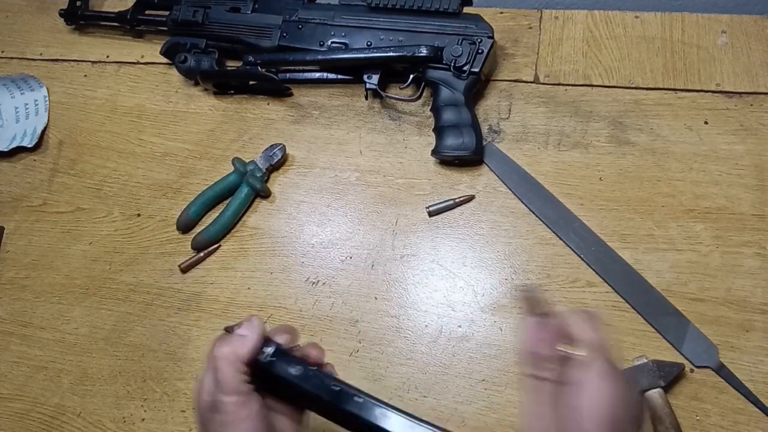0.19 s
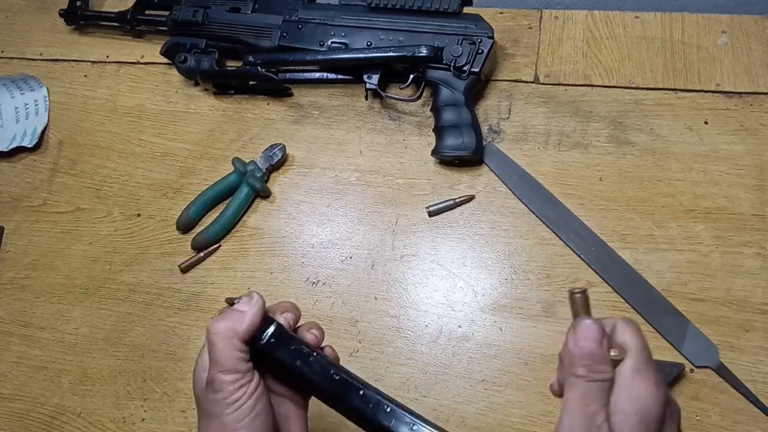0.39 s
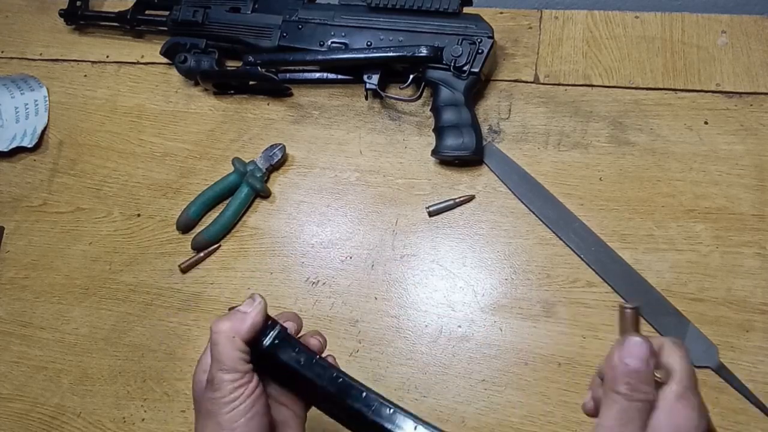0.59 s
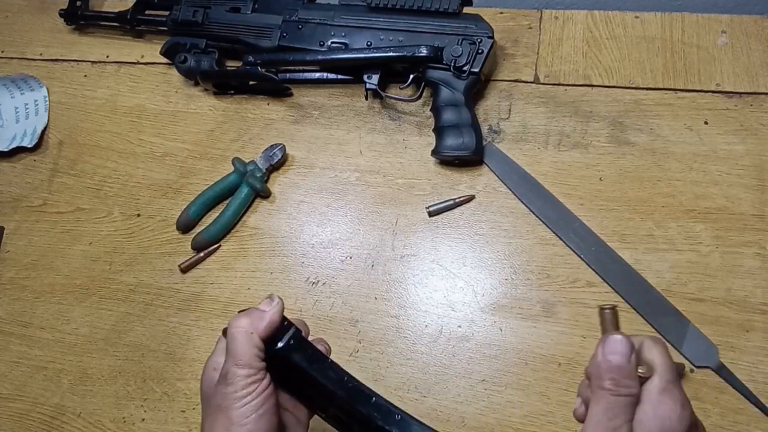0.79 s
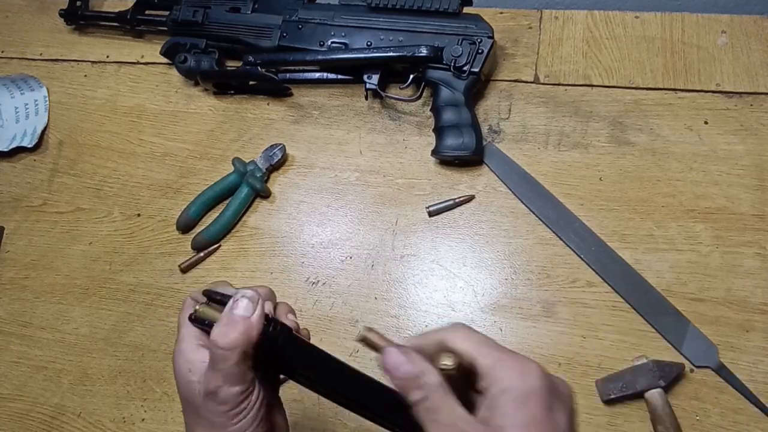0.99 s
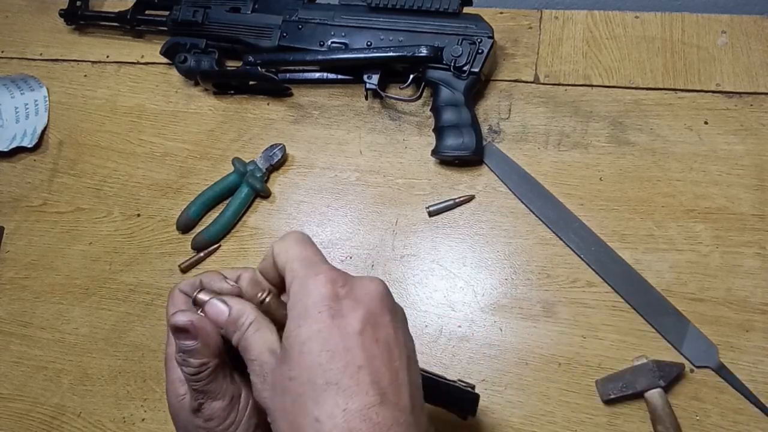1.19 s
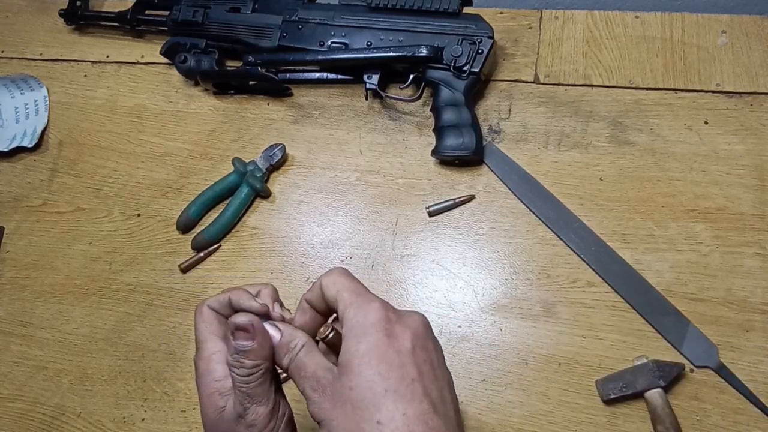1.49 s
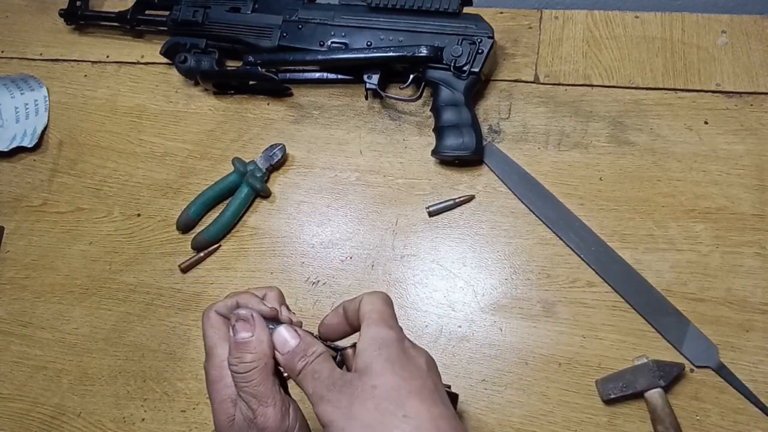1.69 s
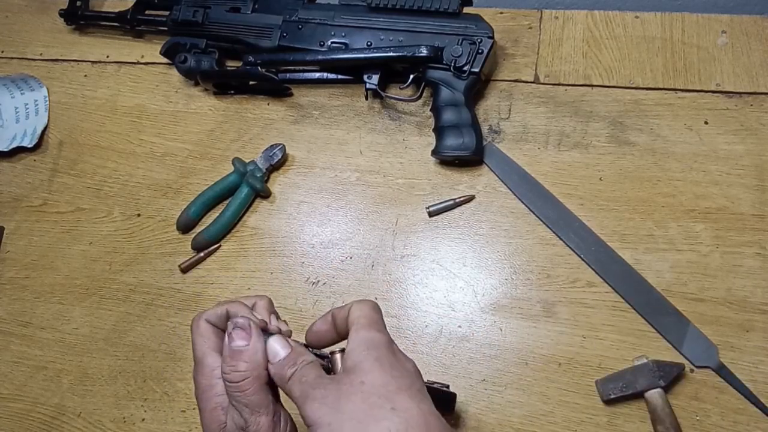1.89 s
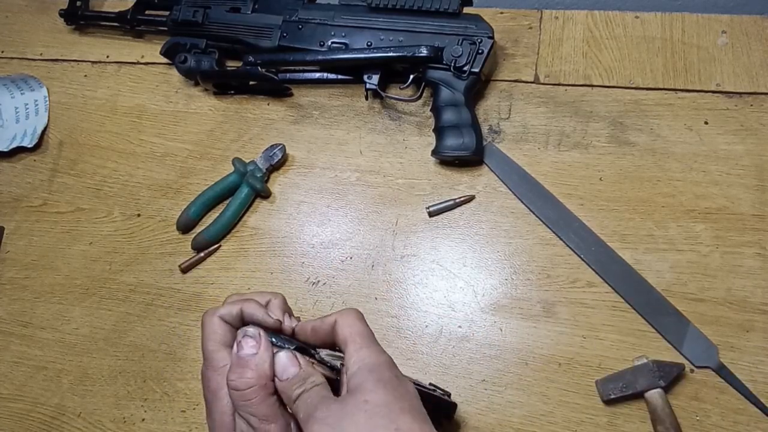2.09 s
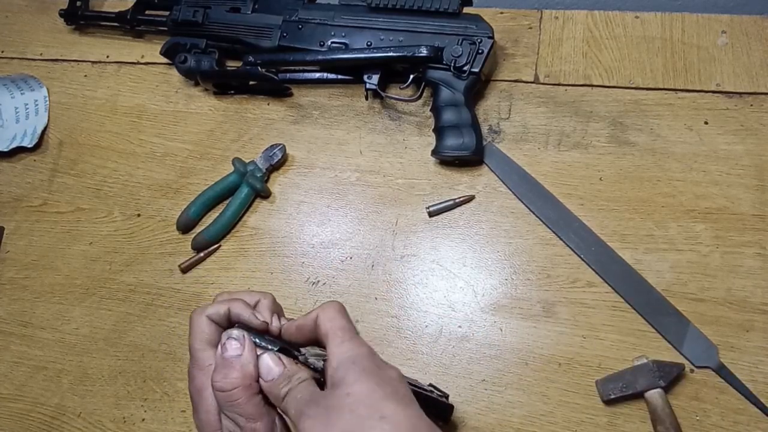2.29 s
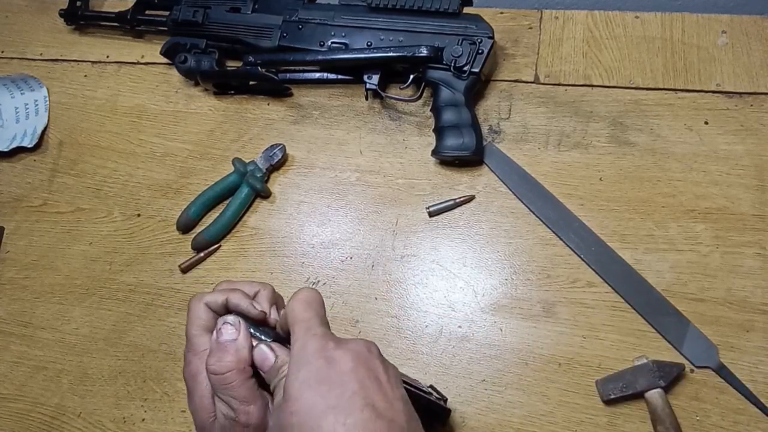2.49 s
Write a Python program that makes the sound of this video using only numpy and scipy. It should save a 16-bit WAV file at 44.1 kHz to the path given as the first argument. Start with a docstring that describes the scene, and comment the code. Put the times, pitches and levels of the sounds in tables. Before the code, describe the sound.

Rifle magazine handling: four loud cartridge rattles, then metallic clicks, dull bumps and a scraping push

```python
"""In a small workshop, a steel rifle magazine is jolted four times by hand: stacked cartridges clatter on its walls.
Then the next cartridge slides onto the feed lips, clicks, is thumbed down with dull bumps and scrapes back home.
Clatter, clicks and scrapes are built from tiny random contacts; bumps and squeaks come from resonances.
The sound is close and nearly mono, with short room echoes and a faint hiss of room air."""
import sys
import numpy as np
from scipy import signal
from scipy.fft import rfft, irfft, next_fast_len
from scipy.io import wavfile
from scipy.ndimage import uniform_filter1d

SR = 44100
rng = np.random.default_rng(int(sys.argv[2]) if len(sys.argv) > 2 else 0)


def put_to_file(sound):
    """Save the sound as 16-bit audio at rate SR, in the file named by the first command-line argument."""
    columns = np.atleast_2d(sound).T  # one column per channel
    safe = np.clip(columns, -1, 1)
    whole_steps = np.round(safe * 32767)
    wavfile.write(sys.argv[1], SR, whole_steps.astype(np.int16))


N = 114660
TIME = np.arange(N) / SR

SHELL_DB, SHELL_FAR_DB = -15, -21.5  # ring of the shell: straight to the microphone, and towards the walls
# The stack hits the magazine wall. Columns: peak_s, level_db, lead_s (first touch before the peak),
# build_up_db, die_away_s, tilt_db_per_octave, bass_db, room_db
JOLT_HITS = [(0.247, -20.5, 0.014, 12.5, 0.00092, -2.05, -5.5, -3),
             (0.4127, -19.5, 0.0068, 27, 0.0027, 0.06, -2, -1.5),
             (0.5828, -17.5, .009, 15, 0.0033, .5, 1, -2), (0.7636, -25.5, .012, 39, 0.0068, 0, 4.5, 2)]


def jolts(count=4):
    """Each jolt reaches the microphone directly and radiates differently towards each wall."""
    out = np.zeros(N)
    walls = [room_response() / np.sqrt(count) for _ in range(count)]
    for jolt in JOLT_HITS:
        peak_s, lead_s, room_db = jolt[0], jolt[2], jolt[-1]
        start_s = peak_s - lead_s
        add(out, start_s, rattle(jolt, SHELL_DB))
        for wall in walls:
            echo = signal.fftconvolve(rattle(jolt, SHELL_FAR_DB), wall)
            add(out, start_s, from_db(room_db) * echo)
    return out


JOLT_CONTACTS_PER_S = 11000
SHELL_DETUNE = 0.015  # typical random pitch shift of each resonance, as a fraction
# Tone of the clatter before tilt and bass are added. Columns: pitch_hz, gain_db
JOLT_TONE = [(29, -71), (50, -39), (116, -12), (163, -19.5), (203, -19.5), (428, -19), (472, -20),
             (646, -25), (927, -5), (1150, -6), (1400, -7), (2010, -7), (2440, 0.5), (3760, -7.5),
             (4560, -2.5), (5400, -7), (9410, -37), (14900, -26.5), (16000, -32)]
# Resonances of the magazine shell before the random pitch shift.
# Columns: pitch_hz, relative_level_db, t60_s (time to fade by 60 dB)
SHELL_MODES = [(950, -31, 0.1), (1384, -24.5, .06), (1690, -31, 0.055), (2270, -17.5, .015),
               (2620, -35.5, .07), (2870, -24.5, .015), (3320, -15, 0.028), (4110, -23.5, 0.045),
               (4350, -17, 0.016), (5700, -29, .02)]


def rattle(jolt, shell_db):
    """Cartridges land one after another within milliseconds and ring the shell."""
    _, level_db, lead_s, build_db, fall_s, tilt, bass_db, _ = jolt
    t = np.arange(SR // 6) / SR - lead_s
    build_up = from_db(build_db * np.minimum(t, 0) / lead_s)
    die_away = np.exp(-np.maximum(t, 0) / fall_s)
    contacts = grains(len(t), JOLT_CONTACTS_PER_S) * build_up * die_away
    shell = []
    for hz, mode_db, t60 in SHELL_MODES:
        shell.append((hz * (1 + SHELL_DETUNE * rng.standard_normal()), mode_db, t60))
    clatter = contacts + ring(contacts, shell, 0) * from_db(shell_db)

    def tone_db(hz):
        slope_db = tilt * np.log2(np.maximum(hz, 700) / 3000)
        return at_hz(JOLT_TONE, hz) + slope_db + bass_db / (1 + (hz / 600) ** 4)
    return from_db(level_db) * unit_hit(colour(clatter, tone_db))


CLICK_FALL_S, CLICK_SKIRT_DB = 0.003, -30  # skirt: relative level far away from the main pitch
# Single metal contacts. Columns: main_blow_s, level_db, centre_hz, width_octaves, build_up_s, room_db
CLICK_HITS = [(0.0012, -40.5, 3060, 1.43, 0.0014, -5), (0.0313, -44, 1850, 0.95, 0.0014, -28),
              (0.111, -57.5, 3720, 0.28, 0.00014, -21), (0.1133, -62.5, 1870, 0.12, 0.00043, -4),
              (0.1516, -59.5, 1550, 0.18, 0.0016, -14.5), (1.0254, -47, 2600, 0.54, 0.0021, -8.5),
              (1.2488, -29, 5936, 0.73, 0.00004, -14.5), (1.2517, -43.5, 4660, 0.93, 0.00026, -21),
              (1.3201, -54, 2500, 0.87, 0.0007, -2.5), (1.3555, -66.5, 2600, 0.61, 0.00041, -20),
              (1.5385, -29, 3520, 1.035, 0.0031, -10), (1.7299, -53, 3100, 0.38, 0.00099, -1),
              (1.729, -55.5, 5440, 0.18, 0.0003, -8), (1.8992, -63, 2310, 0.62, .0005, -2),
              (1.9467, -60.5, 2130, .45, 0.0006, -6.5), (2.0117, -63, 2600, 3.7, 0.003, 2),
              (2.071, -64.5, 4930, 0.82, 0.00035, 3), (2.1071, -48.5, 3850, 1.28, 0.0021, -7),
              (2.1245, -47.5, 2560, 0.64, 0.0044, -10.5), (2.1790, -56, 2850, 1.6, 0.0068, -16),
              (2.186, -54, 2400, 0.38, 0.0024, -19), (2.2038, -55.5, 2360, 2.6, 0.0039, -9.5),
              (2.4240, -60, 3220, 0.53, 0.00082, -7.5), (2.5381, -60.5, 2088, 0.13, 0.001, -3),
              (2.5772, -41, 3450, 1.1, 0.0013, 1.5), (2.5765, -37, 2146, 0.19, 0.0006, -7)]


def clicks():
    """A cartridge touches the feed lips or its neighbours, in a quick burst around one blow."""
    direct, to_room = np.zeros((2, N))
    for blow_s, level_db, hz, octaves, rise_s, room_db in CLICK_HITS:
        contacts = cluster(rise_s, CLICK_FALL_S, main=1.4)
        click = from_db(level_db) * unit_hit(metal(contacts, hz, octaves, CLICK_SKIRT_DB))
        start_s = blow_s - .03  # the main blow sits 30 ms into the burst
        add(direct, start_s, click)
        add(to_room, start_s, click * from_db(room_db))
    return np.array([direct, to_room])


BUMP_LOW_HZ = 92  # the bass weakens below this
# Hands bump the magazine. Columns: start_s, level_db, softness_hz (treble fades above this), room_db
BUMP_HITS = [(0.002, -46, 286, -11), (0.0209, -41, 631, -6.5), (0.235, -48, 250, -11.5),
             (0.405, -47, 500, -14), (0.574, -41.5, 400, -10), (0.756, -44.5, 400, -21.5),
             (1.4861, -43, 700, -5), (1.496, -32.5, 556, -1.5), (1.5365, -33.5, 309.4, -3.5),
             (1.571, -43, 199, -9), (1.599, -48.5, 353, -5), (1.6200, -45, 463, 1), (1.678, -58, 258, -19),
             (2.023, -48, 158, 4), (2.067, -48.5, 202, 8), (2.087, -43.5, 203, 4.5),
             (2.101, -46.5, 430, 9.5), (2.11, -39.5, 203, -13), (2.176, -38.5, 259, -0.5),
             (2.2010, -39, 209, 4), (2.247, -50, 200, -9), (2.475, -57.5, 123, -12),
             (2.4950, -58.5, 108, 5), (2.539, -51.5, 104.8, 5), (2.5810, -42.5, 307, 4.5)]
# Resonances of the magazine held in the hand. Columns: pitch_hz, relative_level_db, t60_s
GRIP_MODES = [(106, -5.5, 0.066), (155, 3, 0.059), (215, 1, 0.01), (325, -1.5, 0.037), (560, -6, .02),
              (1250, -6, 0.03)]


def bumps():
    """Soft pushes of the thumb and blows of the palm shake the hand-damped magazine, which answers with short
    low notes."""
    direct, to_room = np.zeros((2, N))
    response = ring(signal.unit_impulse(SR // 4), GRIP_MODES, np.pi / 2)
    for start_s, level_db, soft_hz, room_db in BUMP_HITS:
        def softness_db(hz):
            treble_loss = 1 + (hz / soft_hz) ** 6
            bass_loss = 1 + (BUMP_LOW_HZ / (hz + 1)) ** 4
            return -10 * np.log10(treble_loss * bass_loss)
        bump = from_db(level_db) * unit_hit(colour(response, softness_db))
        add(direct, start_s, bump)
        add(to_room, start_s, bump * from_db(room_db))
    return np.array([direct, to_room])


PUSH_DB, PUSH_ROOM_DB = -0.5, -11.5
SLIPS_PER_S = 2200
# Loudness path as the cartridge is pushed home, before PUSH_DB is added. Columns: time_s, level_db
PUSH_PATH = [(2.22, -78), (2.242, -48), (2.262, -48), (2.404, -54), (2.496, -78.5), (2.51, -92)]
# Tone of the grating. Columns: pitch_hz, gain_db
PUSH_TONE = [(500, -39.5), (1150, -35.5), (1600, -4), (2400, -2), (2800, -3), (3400, -10), (4200, -16),
             (5500, -25), (8000, -56)]


def push():
    """The case grates along the feed lips in dense tiny slips."""
    time_s, level_db = np.transpose(PUSH_PATH)
    slips = rms_one(colour(grains(N, SLIPS_PER_S), lambda hz: at_hz(PUSH_TONE, hz)))
    path_db = np.interp(TIME, time_s, level_db, left=-150, right=-150)
    grating = slips * from_db(PUSH_DB + path_db)
    return np.array([grating, grating * from_db(PUSH_ROOM_DB)])


SQUEAK_WIDTH_HZ, SQUEAK_EDGE_S, SQUEAK_ROOM_DB = 54, 0.0096, -18.5
# Narrow squeaks and groans of the sliding cartridge and thumb. Columns: start_s, length_s, level_db,
# fade_db (drop over the length; negative grows), start_hz, end_hz
SQUEAK_SLIDES = [(0.022, .13, -45.5, 20, 155.5, 154.4), (0.015, .065, -48.5, 13, 325, 332.5),
                 (1.39, 0.068, -72, -9, 1265, 1232), (1.613, 0.063, -51, 11, 328, 476),
                 (1.744, .05, -71, -4, 1386, 1357), (1.893, .11, -70, 1.5, 780, 779),
                 (2.238, 0.058, -52, 0, 2538, 2707), (2.305, 0.19, -49.5, 23.5, 2734, 2940),
                 (2.255, 0.022, -48.5, -1.5, 1582, 1630), (2.276, 0.21, -50.5, 28, 2052, 2280),
                 (2.382, 0.12, -66.5, 3.5, 3410, 3575)]


def squeaks():
    """Friction feeds one narrow resonance, which glides as the contact point moves."""
    out = np.zeros(N)
    for start_s, length, level_db, fade_db, start_hz, end_hz in SQUEAK_SLIDES:
        pitch_hz = np.interp(TIME, [0, length], [start_hz, end_hz])
        phase = 2 * np.pi * np.cumsum(pitch_hz) / SR
        # two random modulations blur the pure tone into a narrow band
        tone = (1 + .5 * wander(SQUEAK_WIDTH_HZ)) * np.cos(phase)
        tone = tone + 0.74 * wander(SQUEAK_WIDTH_HZ) * np.sin(phase)
        add(out, start_s, from_db(level_db) * stroke(length, SQUEAK_EDGE_S, fade_db) * tone)
    return np.array([out, out * from_db(SQUEAK_ROOM_DB)])


RUB_EDGE_S, RUB_GRAINS_PER_S, RUB_ROOM_DB = 0.0037, 1900, -3.5
RUB_FLICKER_DB, RUB_SKIRT_DB = 0.5, -34
# Metal and skin rub on metal. Columns: start_s, length_s, level_db (before flicker),
# fade_db (drop over the length; negative grows), centre_hz, width_octaves
RUB_SLIDES = [(0.004, 0.045, -44.5, 20, 3000, 0.43), (2.093, 0.12, -60, 4.5, 1300, 1.5),
              (0.938, .11, -60, -3, 3450, 0.87), (1.067, .11, -64, 1.5, 3700, 1.25),
              (1.2040, 0.064, -44, 5, 3890, 1.03), (1.404, 0.043, -62.5, 4, 1920, 0.85),
              (1.488, 0.0207, -46, 14, 1050, 0.66), (1.597, 0.025, -81, 15, 2520, 1.1),
              (2.25, 0.24, -61, 12, 255, 0.43), (2.23, 0.15, -67, 6.5, 950, 0.92),
              (2.315, .05, -59.5, 4, 4800, 0.61)]


def rubs():
    """Short uneven slides made of dense little catches."""
    out = np.zeros(N)
    for start_s, length, level_db, fade_db, hz, octaves in RUB_SLIDES:
        catches = rms_one(metal(grains(SR // 4, RUB_GRAINS_PER_S), hz, octaves, RUB_SKIRT_DB))
        envelope = stroke(length, RUB_EDGE_S, fade_db)[:len(catches)]
        add(out, start_s, from_db(level_db) * envelope * catches)
    out = out * from_db(RUB_FLICKER_DB * wander(48))
    return np.array([out, out * from_db(RUB_ROOM_DB)])


# Shared tone of small metal parts. Columns: pitch_hz, gain_db
METAL_TONE = [(60, -12), (500, -5.5), (1100, 4), (2400, 0.5), (5500, 1), (7000, -17.5), (10500, -28.5),
              (13000, -12), (16000, -7)]


def metal(x, centre_hz, octaves, skirt_db):
    """Small metal parts answer most around one pitch."""
    def gain_db(hz):
        distance = np.log2((hz + 1) / centre_hz) / octaves
        hump = np.exp(-.5 * distance ** 2)
        return at_hz(METAL_TONE, hz) + 20 * np.log10(hump + from_db(skirt_db))
    return colour(x, gain_db)


ROOM_DELAY_S = 0.0011  # silence before the echoes, then an equally long rise
ROOM_BEND = 1.297  # above 1 the echoes fall slowly at first, then faster
# How long the room echoes. Columns: pitch_hz, t60_s
ROOM_FADE = [(100, 0.4044), (300, 0.2061), (1000, 0.27), (3000, 0.26), (5500, 0.24), (8000, 0.24),
             (11000, 0.2), (15000, 0.22)]
# Tone of the room's echoes. Columns: pitch_hz, gain_db
ROOM_TONE = [(100, -2.5), (400, 0.5), (1000, 3.5), (3000, 1.5), (6000, 1.5), (10000, 0.003), (14000, 3.5)]


def room_response():
    """Dense reflections that hold briefly and then fall, with the deepest bass lasting longest."""
    t = np.arange(SR // 2) / SR
    white = rfft(rng.standard_normal(len(t)))
    hz = np.fft.rfftfreq(len(t), 1 / SR)
    out = 0
    for k, (_, t60) in enumerate(ROOM_FADE):
        # neighbouring bands crossfade
        share = at_hz([(f, j == k) for j, (f, _) in enumerate(ROOM_FADE)], hz)
        onset = np.clip(t / ROOM_DELAY_S - 1, 0, 1)
        shape = from_db(-60 * (t / t60) ** ROOM_BEND) * onset
        out = out + irfft(white * share, len(t)) * shape / np.sqrt(np.sum(shape ** 2))
    return colour(out, lambda hz: at_hz(ROOM_TONE, hz))


FLOOR_DB = -74.5
# Tone of the room air. Columns: pitch_hz, gain_db
AIR_TONE = [(30, -19), (100, 0), (300, 0.5), (600, -8.5), (1500, -11.5), (5000, -16), (8000, -26.5),
            (11000, -29.5), (14000, -28.5), (16000, -25)]


def room_air():
    """Steady faint hiss: random noise shaped to the tone of the room."""
    noise = colour(rng.standard_normal(N), lambda hz: at_hz(AIR_TONE, hz))
    return from_db(FLOOR_DB) * rms_one(noise)


def from_db(db):
    """Decibels to gain."""
    return 10 ** (np.asarray(db) / 20)


def at_hz(points, hz):
    """Read a table on a log-frequency axis."""
    f, v = np.transpose(points)
    return np.interp(np.log(np.maximum(hz, 1)), np.log(f), v)


def rms_one(x):
    """Scale to unit rms (average strength)."""
    return x / np.sqrt(np.mean(x ** 2) + 1e-20)


def unit_hit(x):
    """Scale to the energy of 10 ms at unit rms."""
    return x / np.sqrt(np.sum(x ** 2) / (.01 * SR) + 1e-20)


def add(out, start_s, x):
    """Mix x in from start_s, trimming what falls outside."""
    i = int(round(start_s * SR))
    x, i = x[max(-i, 0):], max(i, 0)
    out[i:i + len(x)] += x[:max(N - i, 0)]


def colour(x, db_at):
    """Causal (minimum-phase) filter with the gain db_at(Hz)."""
    n = 2 * next_fast_len(len(x) // 2 + 2048)
    hz = np.arange(n // 2 + 1) * SR / n
    cepstrum = irfft(np.log(from_db(db_at(hz))), n)
    # folding the cepstrum forward in time keeps the filter from sounding early
    cepstrum[1:n // 2] *= 2
    cepstrum[n // 2 + 1:] = 0
    return irfft(rfft(x, n) * np.exp(rfft(cepstrum)), n)[:len(x)]


def ring(x, modes, phase):
    """Sum of decaying partials set off by x."""
    t = np.arange(len(x)) / SR
    response = 0
    for hz, level_db, t60 in modes:
        response = response + from_db(level_db - 60 * t / t60) * np.cos(2 * np.pi * hz * t - phase)
    return signal.fftconvolve(x, response)[:len(x)]


CONTACTS_PER_S, CONTACT_SPREAD_DB = 5000, 1.5  # contact rate in a click; unevenness of all contacts


def grains(size, rate):
    """Random tiny contacts of uneven strength."""
    happens = rng.random(size) < rate / SR
    sign = rng.choice([-1, 1], size)
    strength = from_db(CONTACT_SPREAD_DB * np.clip(rng.standard_normal(size), -2, 2))
    return happens * sign * strength


def cluster(rise_s, fall_s, main):
    """A quarter second in which contacts swell to one main blow, 30 ms in, and die away."""
    t = (np.arange(SR // 4) - int(.03 * SR)) / SR
    decay = np.where(t < 0, np.abs(t / rise_s) ** 0.8, np.abs(t / fall_s))
    x = grains(len(t), CONTACTS_PER_S) * np.exp(-decay)
    x[t == 0] = main
    return x


def wander(hz):
    """Smooth chance of unit rms that changes at about this rate."""
    lowpass = signal.butter(2, hz, fs=SR, output="sos")
    noise = rng.standard_normal(N + 8000)
    return rms_one(signal.sosfilt(lowpass, noise)[8000:])  # skip the filter's start-up


def stroke(length, edge_s, fade_db):
    """Envelope of one slide: soft edges and a steady change of level."""
    edges = np.clip(np.minimum(TIME, length - TIME) / edge_s, 0, 1)
    return edges * from_db(-fade_db * np.minimum(TIME / length, 1))


SIDE_LAG, WIDTH_DB = 90, -22.5  # sideways treble: delay in samples, level


def scene():
    """Handling sounds in the middle; only the highest treble spreads sideways."""
    direct, to_room = clicks() + bumps() + rubs() + squeaks() + push()
    echoes = signal.fftconvolve(to_room, room_response())[:N]
    mid = direct + echoes + jolts() + room_air()
    highpass = signal.butter(8, 7500, "high", fs=SR, output="sos")
    side = signal.sosfilt(highpass, np.pad(mid, (SIDE_LAG, 0))[:N])
    return mid + from_db(WIDTH_DB) * side * np.array([[1], [-1]])


SUPPRESS_DEPTH_DB = -10
# Threshold below which a band is turned down. Columns: pitch_hz, threshold_db
SUPPRESS_THRESHOLD = [(100, -75), (400, -75.5), (1500, -82.5), (5000, -76.5), (8000, -93), (15000, -81)]


def suppress(x):
    """A noise suppressor turns down bands that fall under a threshold."""
    hz, _, frames = signal.stft(x, SR, nperseg=512, noverlap=384)
    power = np.abs(np.mean(frames, axis=0)) ** 2
    power = uniform_filter1d(power, size=5, axis=0)  # average neighbouring bands
    threshold = from_db(at_hz(SUPPRESS_THRESHOLD, hz))[:, None] ** 2
    keep = power / (power + threshold)
    frames = frames * from_db(SUPPRESS_DEPTH_DB * (1 - keep))
    return signal.istft(frames, SR, nperseg=512, noverlap=384)[1][:, :N]


PEAK_LIMIT, CUTOFF_HZ = 0.93, 16200


def record(dry):
    """Faint tails are suppressed, peaks are rounded and the top is cut steeply."""
    rounded = PEAK_LIMIT * np.tanh(suppress(dry) / PEAK_LIMIT)
    lowpass = signal.ellip(10, .2, 80, CUTOFF_HZ, fs=SR, output="sos")
    return signal.sosfilt(lowpass, rounded)


dry = scene()
out = record(dry)
put_to_file(out)
```